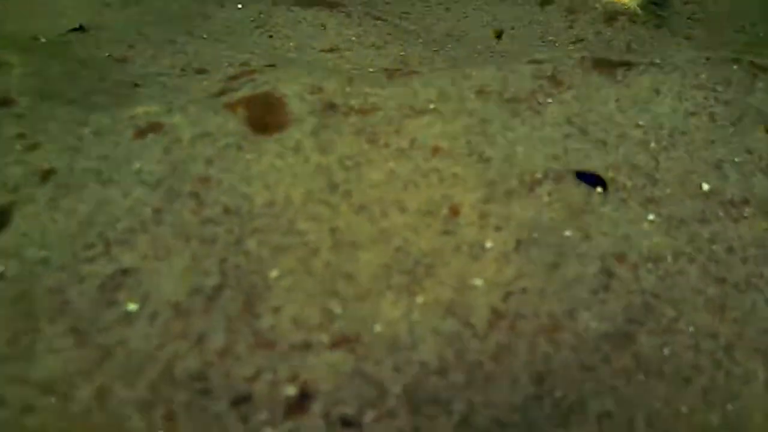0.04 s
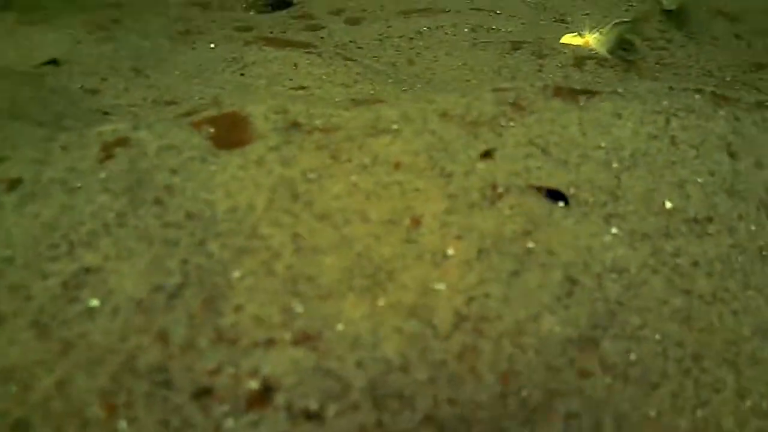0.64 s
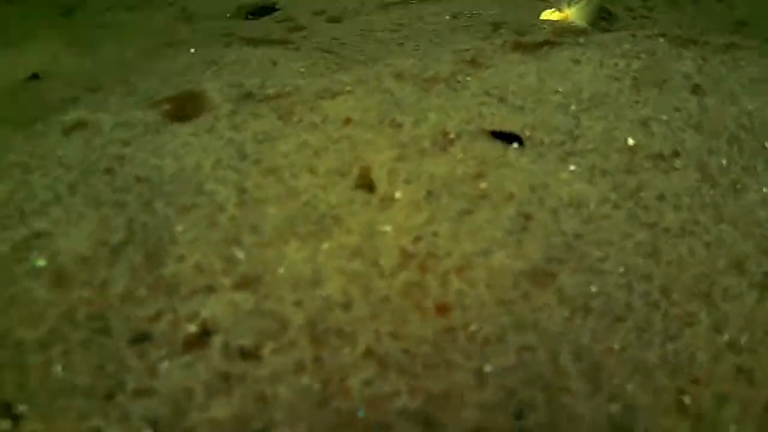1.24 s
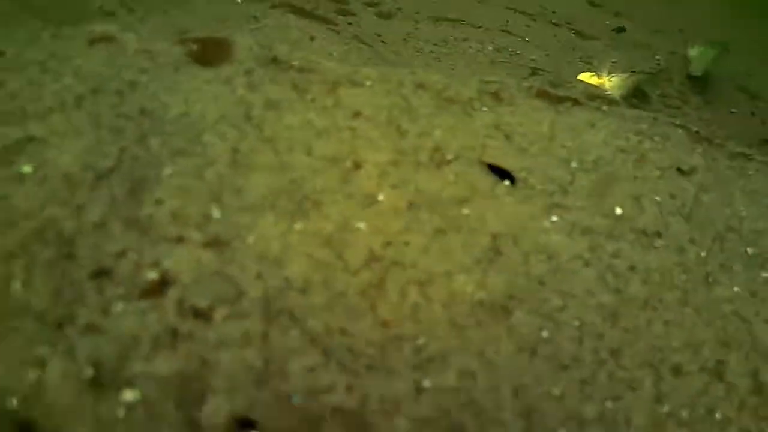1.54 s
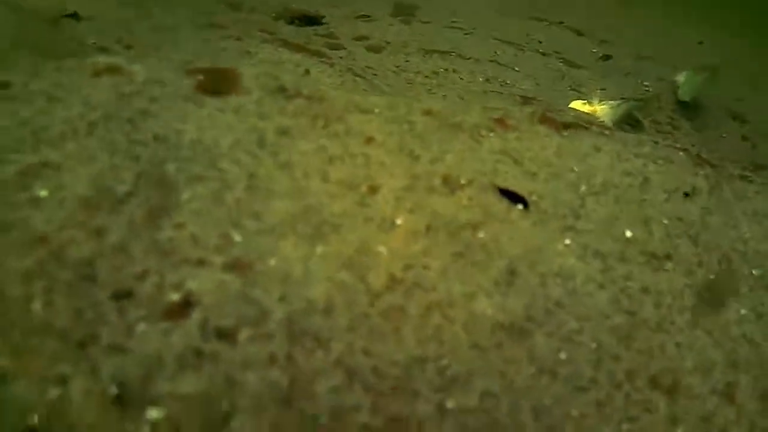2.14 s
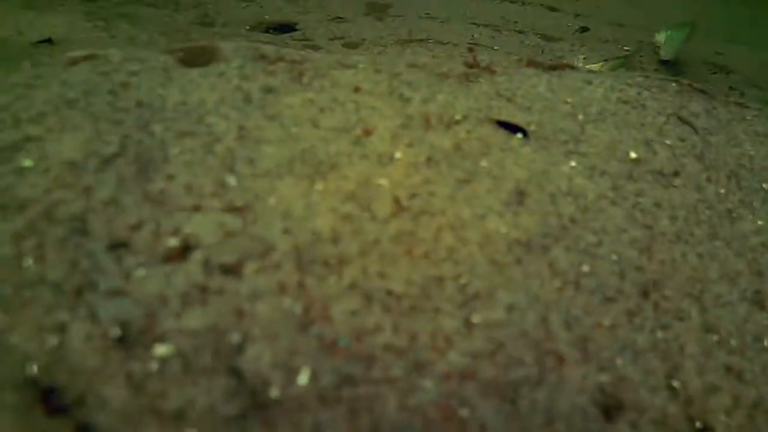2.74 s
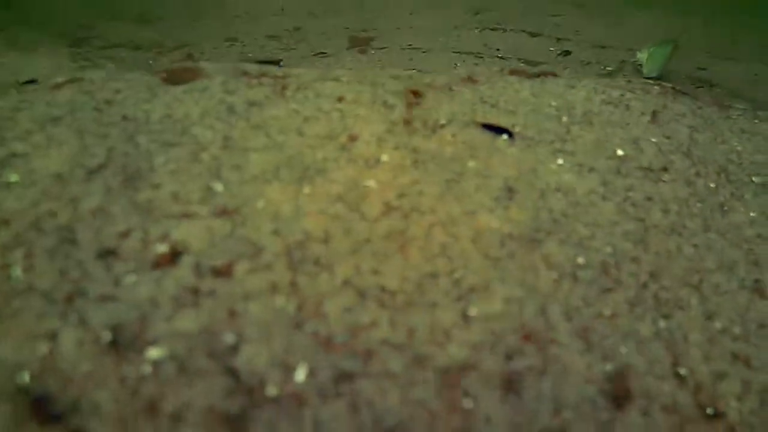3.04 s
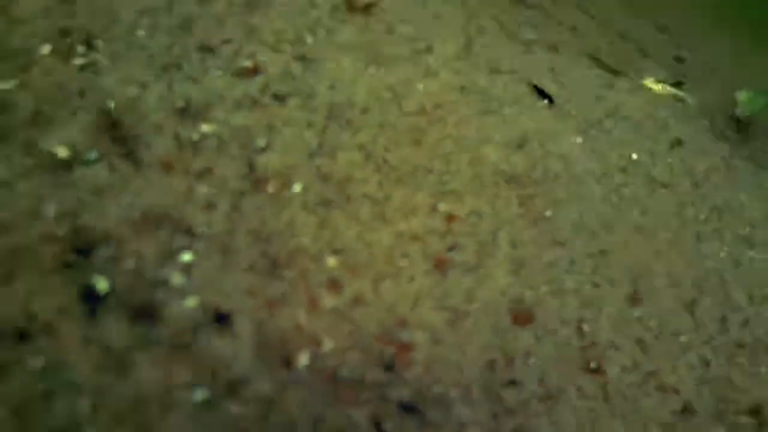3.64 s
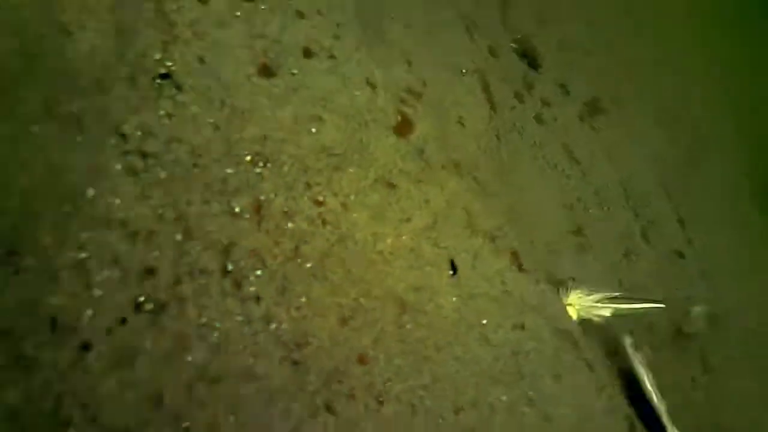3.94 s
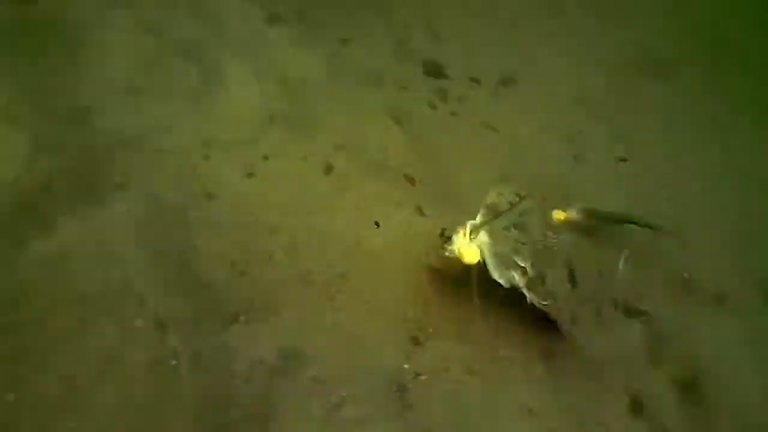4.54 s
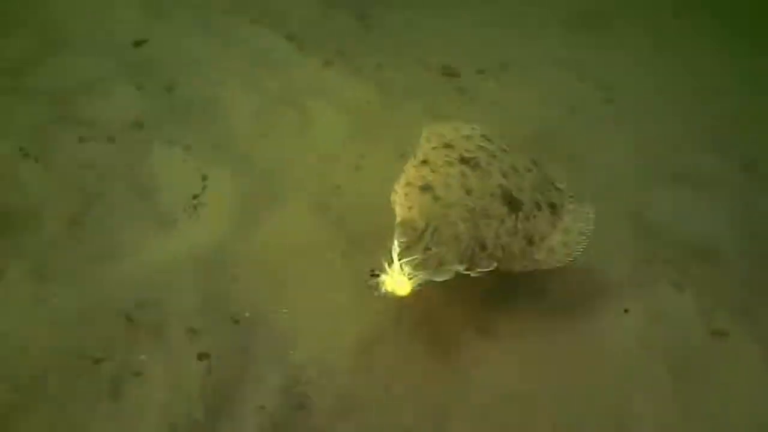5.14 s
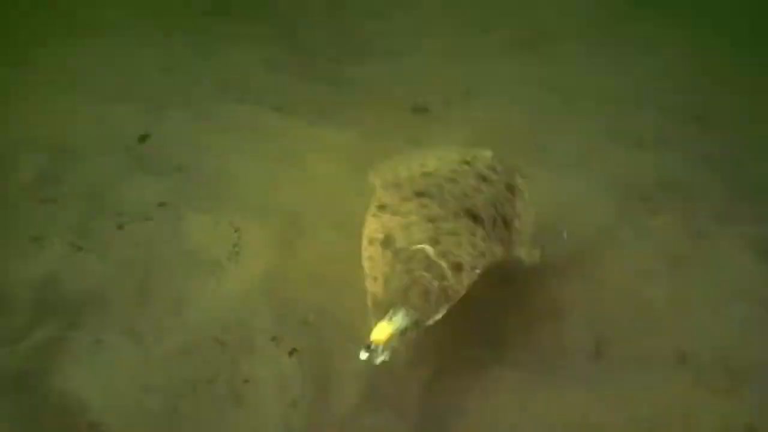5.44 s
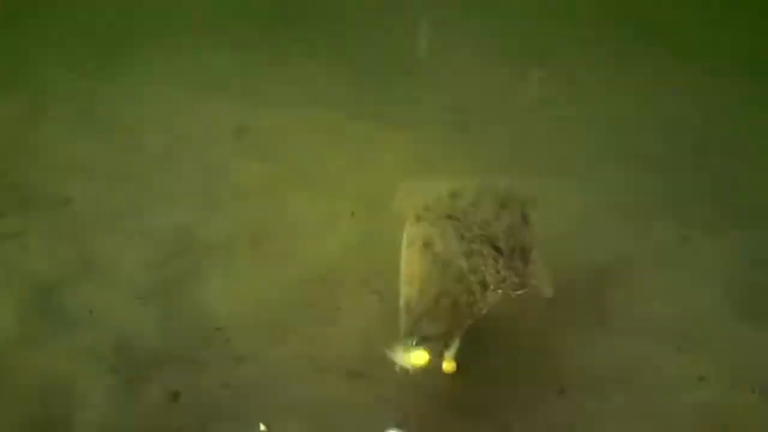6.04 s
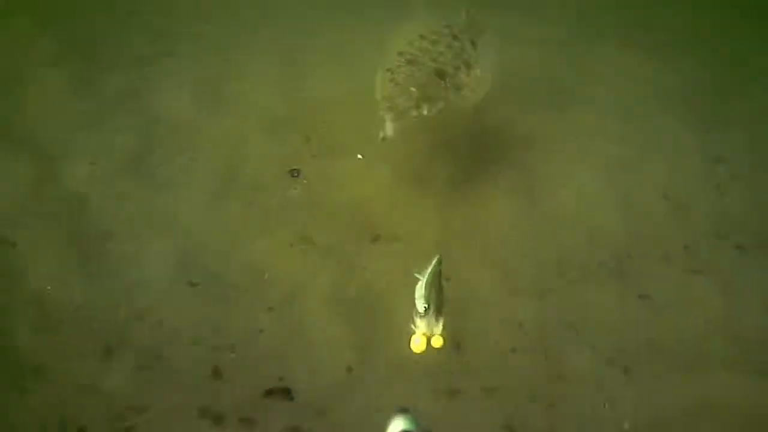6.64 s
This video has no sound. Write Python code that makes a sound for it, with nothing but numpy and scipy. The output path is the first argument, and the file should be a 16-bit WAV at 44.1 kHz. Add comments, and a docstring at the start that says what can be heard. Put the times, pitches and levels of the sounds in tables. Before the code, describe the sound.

Muffled underwater ticks and sand scrapes from a towed fishing rig, building to sharp rattles and knocks of tackle on its housing.

```python
"""Loose tackle rattles and knocks on a camera rig's watertight housing, heard from inside, as a fish
follows the lure. Each hit rings a few damped resonances; the hardest blows overload the microphone.
The rig is being towed over a sandy sea bed: grit ticks against it, sand scrapes it, and a big bump
leaves it sounding hollow. Behind that the tow line sings faintly and rasps through its clip,
and water swells against the housing."""
import sys
import numpy as np
from scipy import signal
from scipy.fft import rfft, irfft, next_fast_len
from scipy.io import wavfile

SR = 44100
rng = np.random.default_rng(int(sys.argv[2]) if len(sys.argv) > 2 else 0)


def output_pcm(signal):
    """Save a mono or channel-first signal as 16-bit PCM at the path in sys.argv[1].

    Samples are clipped to [-1, 1] before scaling.
    """
    pcm = np.clip(np.atleast_2d(signal).T, -1, 1) * 32767
    wavfile.write(sys.argv[1], SR, np.round(pcm).astype(np.int16))


N = 298998
HIT_SAMPLES = 2048
GRAZE_S, GRAZE_DB = .005, -20.5  # surfaces graze just before a contact closes

# Deep water pressure, and the steady noise bed. Each row: frequency in Hz, relative level in dB.
SWELL_SPECTRUM = [(10, 4.5), (45, -6), (70, -9), (110, -13.5), (220, -22), (400, -37.5), (800, -88.5)]
BED_SPECTRUM = [(8.8, -37), (15, 15.5), (22, -22.5), (53, -11.5), (77, -22), (112, -19.5), (417, -19.5),
                (527, -21), (1060, -28.5), (2200, -27), (2700, -34), (3720, -26.5), (5930, -33),
                (14200, -33.5), (16000, -41)]
# Jolts push water against the housing and tug the line.
# Each row: peak time in seconds, water level in dB, line level in dB before the line's trim.
JOLTS = [(0.38, -51, -58), (0.58, -51, -50), (3.52, -44.5, -56), (4.14, -43.5, -63), (4.755, -28, -38),
         (4.89, -31.5, -41.5), (5.479, -28, -46.5), (5.635, -34, -46.5), (6.045, -26, -45),
         (6.26, -36.5, -66)]
# The steady tow. Each row: time in seconds, line hiss in dB before its trim, sand patter in dB.
TOW_LEVELS = [(0, -49.5, -57), (.3, -50.5, -60.5), (1.0, -51.5, -63), (1.8, -50, -61), (2.4, -51, -58),
              (2.7, -52, -64.5), (3.25, -52.5, -66.5), (3.45, -49.5, -53), (4.4, -51.5, -60),
              (5.3, -50, -61.5), (6.35, -54, -65), (6.78, -55.5, -69)]
# The line's three lowest resonances drift with its load.
# Each row: time in seconds, then the first, second and third frequency in Hz.
LINE_DRIFT = [(0, 1570, 2100, 3466), (3.0, 1626, 2250, 3525), (3.8, 1566, 2220, 3600),
              (4.5, 1640, 2340, 3900), (5.0, 1640, 2170, 3500), (5.4, 1646, 2450, 3720),
              (6.4, 1670, 2375, 3170)]
# The shape of those three resonances. Each row: width in Hz, relative level in dB.
DRIFTING_MODES = [(177.4, 5), (170, 3), (333, 0)]

# What rings. Each row: frequency in Hz, width in Hz, relative level in dB.
MOUNT_MODE = [(201, 16, 0)]  # the shaken mount
UPPER_LINE_MODES = [(5000, 320, -6), (5750, 200, -20), (7700, 160, -5)]  # the towed line's steady top
ZING_MODES = [(1524, 66, 3), (3220, 180, -2), (5730, 89, -3), (7800, 240, -29)]  # the taut line sliding
SAND_MODES = [(950, 310, 0.5), (1390, 260, -1), (1638, 230, -0.5), (2166, 260, -1), (2720, 610, -7.5),
              (3400, 420, 1), (5390, 300, -9), (7800, 300, -23.5)]  # the rig rubbed by sand
GRIT_MODES = [(972.4, 253, -1.5), (1440, 119, 4), (2112, 140, -1), (2640, 366, -1), (3340, 214, 2.5),
              (4110, 280, -7.5), (5120, 480, -11), (5655, 400, -5.5), (7790, 260, -20.5), (8840, 410, -23)]  # the rig struck by grit
HOLLOW_MODE = [(970, 140, 5.4)]  # the rig's hollow ring
PUSH_MODES = [(84.3, 166, -1.5), (250.6, 210, 1), (483, 160, -0.5)]  # the whole housing shoved
SHELL_MODES = [(655, 110, -5), (886, 180, -10), (1143, 120, -8)]  # its shell, in the mids
WALL_MODES = [(1568, 116, -5), (1712, 182, -7), (2131, 150, -17), (3540, 170, -20.5)]  # its wall, higher up
TACKLE_MODES = [(852, 200, -6.5), (1567, 165, 1), (2020, 220, -0.5), (2520, 340, -5.5), (3170, 470, 0.5),
                (3600, 357, 3), (5290, 390, -8.5), (5760, 380, -7.5), (7795, 440, -19), (10180, 1300, -36)]  # the housing struck by tackle

# Tone colours. Each row: frequency in Hz, relative level in dB.
RASP_SPECTRUM = [(60, 3.5), (600, -1.5), (1600, 5), (2500, -2.5), (3500, 3.5), (4600, -17), (5700, -5),
                 (7000, -19), (10000, -20), (16000, -44)]  # the jerked line
CRACK_SPECTRUM = [(100, -12.5), (600, -10), (1200, 8.5), (4000, 10.5), (7000, -6), (10000, -18.5),
                  (13000, -17), (16000, -17.5)]  # the bright edge of a hard contact
CRUNCH_SPECTRUM = [(100, -7.5), (600, -0.5), (1600, -4.5), (3500, -4), (4600, -11), (5700, -1),
                   (8000, -14.5), (10500, -23), (16000, -33.5)]  # the dull edge of a blunt one
PASSAGE_EQ = [(200, -0.5), (650, -9.5), (950, 2), (7500, 0.5), (10000, 2), (16000, -12.5)]  # water and wall take low mids and top off small contacts

# Short strokes. Each row: start in seconds, length in seconds, level in dB.
MOUNT_HUMS = [(4.92, 0.116, -54)]  # the mount after a shake
LINE_RASPS = [(4.699, 0.027, -29.5), (4.731, 0.043, -25), (4.906, 0.015, -29), (5.03, 0.07, -57),
              (5.444, 0.032, -29.5), (6.041, 0.033, -27)]  # the line jerked through its clip
LINE_ZINGS = [(4.984, 0.019, -34), (5.014, 0.097, -38.5), (5.748, 0.021, -42)]  # the line sliding
RATTLE_SPELLS = [(4.587, .03, -42), (4.7, 0.077, -31.5), (5.011, .05, -32.5), (5.49, .02, -33),
                 (5.647, 0.026, -39), (5.753, .12, -39), (6.212, .025, -36.5)]  # loose tackle jiggling
# The rig sliding through sand. Each row: start and length in seconds, level in dB, body EQ in dB.
SAND_SCRAPES = [(0, 0.47, -61.5, -14), (3.705, 0.11, -56, 6), (3.816, 0.11, -51.5, -1),
                (4.011, 0.043, -35, 7), (4.123, 0.1, -51, 10), (4.271, 0.14, -49, 15),
                (4.637, 0.044, -43.5, 1), (4.773, .19, -43.5, 6), (4.985, 0.23, -55, 6.5),
                (5.47, 0.059, -35, 0.5), (5.537, 0.0202, -42.5, 6), (5.724, 0.0425, -37.5, 4),
                (5.787, 0.13, -47.5, 2.5), (5.907, 0.1, -52, 14), (6.049, 0.033, -37, 12),
                (6.213, 0.028, -40.5, -1)]
# Larger stones striking the rig. Each row: start in seconds, level in dB, body EQ in dB.
STONE_HITS = [(0.017, -44.5, 5), (0.0343, -46, 0), (0.4102, -46, 7), (0.4273, -36, -3), (0.5014, -35, -0.5),
              (0.5074, -46, 2), (0.5207, -38.5, -3.5), (0.5683, -41.5, 10), (0.6471, -42.5, 0),
              (0.6778, -36.5, -3.5), (0.6976, -43, -2), (0.7083, -45.5, 13), (0.8967, -45, -4),
              (0.9213, -47, 2), (1.065, -47.5, -3), (1.084, -45.5, 5.5), (1.1264, -48, 7),
              (1.2122, -39.5, 7), (1.2212, -41, -4), (1.2463, -37.5, -4), (1.365, -48, -8),
              (1.3771, -41, -2), (1.4225, -42, 2), (1.4363, -43, 2), (1.5584, -34.5, 1),
              (1.5897, -40.5, -1), (1.5951, -38, 11), (1.601, -41.5, 4), (1.7173, -33.5, 5),
              (1.732, -35, -5), (1.7376, -40, -6), (1.756, -40.5, 2), (1.7733, -45.5, 4), (1.846, -45, 0),
              (2.2508, -46, 13), (2.2763, -40, 2), (2.3055, -38, -2), (2.3222, -40.5, 5), (2.3429, -43, -4),
              (2.352, -41, 3), (2.499, -43.5, 9), (2.5229, -41, 0.5), (3.386, -43.5, -12), (3.3908, -36, 7),
              (3.3984, -32.5, -3), (3.418, -26, -3), (3.5068, -28.5, 3.5), (3.5505, -23.5, 3.5),
              (3.5758, -40, -1), (3.605, -34.5, -4), (3.6169, -33.5, 0.5), (3.667, -45.5, 7),
              (3.901, -21.5, -1.5), (3.9158, -33, 1), (3.9236, -37, -5), (4.0384, -28.5, -3.5),
              (4.062, -38.5, 1), (4.1009, -40.5, 9), (4.1445, -40.5, 2), (4.175, -39.5, 1),
              (4.188, -38.5, -20), (4.2346, -43.5, 7), (4.3013, -36.5, -14), (4.333, -39.5, 5)]
# The hollow ring opens at the big bump. Each row: time in seconds, send gain from 0 to 1.
HOLLOW_SEND = [(5.47, 0), (5.5, 0.9)]
# Heavy, blunt blows. Each row: start in seconds, then relative push, shell, wall and crunch in dB.
BLOWS = [(4.0112, -23, -44, -14.5, -46.5), (4.0172, -37.5, -41, -17.5, -39), (4.742, -24.5, -29, -26, -43),
         (4.757, -18.5, -32, -16.5, -38), (4.7624, -27, -42, -31, -24), (4.8596, -30, -33, -29, -47),
         (4.9, -27, -46, -35, -52), (4.906, -25, -44, -17.5, -63), (5.4737, -20.5, -10, -7, -13.5),
         (5.496, -37.5, -31.5, -29.5, -40), (5.6196, -33.5, -37.5, -31, -32.5),
         (5.626, -28, -36, -26, -32.5), (5.6319, -19, -25.5, -20, -39), (6.0342, -12, -12.5, -3, -11),
         (6.118, -46.5, -60, -32, -52)]
# Tackle clicking on the housing. Each row: start in seconds, level in dB, body and treble EQ in dB.
TACKLE_HITS = [(4.6188, -36.5, 4.5, 4), (4.6701, -35.5, 10, 5), (4.7045, -31, 15, 12),
               (4.7381, -27, -15, 7), (4.751, -27.5, -5, 15), (4.7749, -33, 7, -2), (4.8058, -36, 0, -7),
               (4.8206, -13.5, -2.5, 1), (4.8312, -19, -1, 1), (4.8549, -24.5, 0, 1), (4.8911, -25, -3, -1),
               (4.9159, -19, 4, 3), (4.9212, -22.5, 5, -9), (4.9378, -29, 9, 10), (4.9425, -29, -8, -4),
               (4.9518, -33, -4, -2), (4.9898, -30.5, 11, -4), (4.9973, -35.5, 7, -1), (5.0139, -35, 0, 0),
               (5.0389, -31, -3, 19), (5.0701, -22.5, -7, 6.5), (5.1552, -31.5, 5, 6.5),
               (5.1667, -35.5, 13, 0), (5.2255, -31.5, 4, 4), (5.2393, -36.5, 1, 11), (5.328, -37.5, 2, 3),
               (5.399, -43, 10.5, 13), (5.4491, -30, 8, 14), (5.4605, -18.5, 0, 4), (5.4684, -23.5, 5, 4),
               (5.4818, -12, 7, 13), (5.5149, -31, -3, 1), (5.5295, -26.5, 5, -3.5),
               (5.5598, -9.5, -0.5, -2.5), (5.5755, -19.5, -4, -1), (5.5849, -17.5, 4.5, 1),
               (5.5923, -29, 18, 13), (5.684, -29.5, 20, -5), (5.6988, -16, 1, 1.5), (5.7315, -33.5, 1, -8),
               (5.742, -31.5, 4, 5), (5.7535, -32, -2, 7), (5.7671, -30, 3, -6), (5.8292, -26.5, -7, -6),
               (5.862, -33.5, -4, -4), (5.8755, -27.5, 5, 4), (5.9561, -21, -0.5, -4),
               (5.9612, -28, -8, -8.5), (5.968, -32.5, 6.5, 1), (5.99, -43, 1, -11.5),
               (6.0206, -30.5, 14, 11), (6.0475, -3, -19, -12), (6.0551, -7.5, -5.5, 9),
               (6.0673, -31, 7, 1), (6.0838, -34.5, 11.5, 8.5), (6.1344, -23, 1, -4.5),
               (6.1451, -33.5, 11, -12), (6.241, -32.5, -12, -4), (6.2583, -39.5, -3, 5),
               (6.2772, -39.5, -7, 4.5)]


def amp(db):
    """Decibels to gain."""
    return 10 ** (np.asarray(db) / 20)


def unit(x):
    """Scale to rms 1."""
    return x / np.sqrt(np.mean(x ** 2) + 1e-20)


def unit_hit(x):
    """Scale a hit to the energy of 5 ms at rms 1."""
    return x / np.sqrt(np.sum(x ** 2) / (SR / 200) + 1e-20)


def eq(points):
    """An EQ curve through (Hz, dB) points on a log axis."""
    freqs, db = np.transpose(points)
    return lambda hz: amp(np.interp(np.log(hz + 1), np.log(freqs), db))


def resonances(modes):
    """Frequency response of a few damped modes, alternating in polarity."""
    return lambda hz: sum((-1) ** k * amp(db) * 1j * hz * width / (centre**2 - hz**2 + 1j * hz * width)
                          for k, (centre, width, db) in enumerate(modes))


def filtered(x, response):
    """Play x through a frequency response."""
    n = x.shape[-1]
    padded = next_fast_len(n + HIT_SAMPLES)
    return irfft(rfft(x, padded) * response(np.fft.rfftfreq(padded, 1 / SR)), padded)[..., :n]


def add(track, s, x):
    """Mix x into the track at s seconds."""
    part = track[max(round(s * SR), 0):][:len(x)]
    part += x[:len(part)]


def curves(rows):
    """An automation curve for each column after the time."""
    times, *columns = np.transpose(rows)
    return [np.interp(np.arange(N) / SR, times, column) for column in columns]


def strokes(rows):
    """Envelope of short strokes with soft edges."""
    level = np.zeros(N)
    for s, length, db in rows:
        add(level, s, amp(db) * signal.windows.tukey(round(length * SR), .2))
    return level


def surges(rows, fall_s, rise_s=0.02):
    """Envelope that swells up to each (seconds, dB) jolt and dies away after it."""
    t = np.arange(N) / SR
    swells = (amp(db) * np.exp(-np.maximum((s - t) / rise_s, (t - s) / fall_s)) for s, db in rows)
    return np.sqrt(sum(swell ** 2 for swell in swells))


def noise(response):
    """Coloured noise of rms 1."""
    return unit(filtered(rng.standard_normal(N), response))


def grains(per_s, spread_db):
    """Tiny random impacts of uneven size."""
    impacts = (rng.random(N) < per_s / SR) * rng.choice([-1, 1], N)
    return impacts * amp(spread_db * np.clip(rng.standard_normal(N), -2, 2))


def burst(t60):
    """A rough contact: noise that falls 60 dB in t60 seconds."""
    return rng.standard_normal(HIT_SAMPLES) * amp(-60 * np.arange(HIT_SAMPLES) / SR / t60)


def grazed(contact):
    """A faint graze leads in; the contact lands GRAZE_S later."""
    lead = round(GRAZE_S * SR)
    graze = rng.standard_normal(HIT_SAMPLES)[:lead] * np.linspace(.3, 1, lead)
    return np.concatenate([amp(GRAZE_DB) * unit_hit(graze), unit_hit(contact)])


def hardness(body_db, treble_db):
    """Colour of a contact through water and wall: soft ones are all body, hard ones are bright."""
    tilt = eq([(1700, body_db), (3200, 0.0039), (5600, treble_db), (7800, treble_db), (11000, 0)])
    return lambda hz: tilt(hz) * eq(PASSAGE_EQ)(hz)


def clicks(hits, modes, contact_t60, chatter_db, crack_db, crack_t60, vary_db, detune):
    """Small hard contacts: a tap and its chatter ring the modes, a little differently at each spot."""
    track = np.zeros(N)
    tap = unit_hit(signal.unit_impulse(HIT_SAMPLES, SR // 4000))
    for s, db, body_db, treble_db in hits:
        spot = [(hz * np.exp(detune * rng.normal()), width, level + vary_db * rng.normal())
                for hz, width, level in modes]
        force = grazed(tap + amp(chatter_db) * unit_hit(burst(contact_t60)))
        ring = unit_hit(filtered(force, resonances(spot)))
        crack = amp(crack_db) * unit_hit(filtered(grazed(burst(crack_t60)), eq(CRACK_SPECTRUM)))
        click = unit_hit(filtered(ring + crack, hardness(body_db, treble_db)))
        add(track, s - GRAZE_S, amp(db) * click)
    return track


def water(swell_db, bed_db):
    """Slow pressure swells on the housing, stronger at each jolt, over a faint steady hiss."""
    jolts = surges([(s, db) for s, db, _ in JOLTS], fall_s=0.05)
    pressure = np.hypot(amp(swell_db), jolts)
    return pressure * noise(eq(SWELL_SPECTRUM)) + amp(bed_db) * noise(eq(BED_SPECTRUM))


def mount_hum():
    """The shaken mount hums briefly in one low, narrow resonance."""
    return strokes(MOUNT_HUMS) * noise(resonances(MOUNT_MODE))


def tow_line(trim_db, sharpness):
    """The towed line sings: hiss through drifting resonances, louder at each tug."""
    hz, t, spectrum = signal.stft(rng.standard_normal(N), SR, nperseg=1024)
    times, *drifts = np.transpose(LINE_DRIFT)
    moving = [(np.interp(t, times, drift), width, db)
              for drift, (width, db) in zip(drifts, DRIFTING_MODES)]
    colour = np.abs(resonances(moving + list(UPPER_LINE_MODES))(hz[:, None])) ** sharpness
    hiss = signal.istft(spectrum * colour, SR, nperseg=1024)[1][:N]
    hiss_db, _ = curves(TOW_LEVELS)
    tugs = surges([(s, db) for s, _, db in JOLTS], fall_s=0.15)
    return amp(trim_db) * np.hypot(amp(hiss_db), tugs) * unit(hiss)


def sand_patter():
    """Fine sand patters on the rig, each grain a tiny ring."""
    _, sand_db = curves(TOW_LEVELS)
    colour = hardness(body_db=1, treble_db=-3)
    patter = filtered(grains(per_s=460, spread_db=9), lambda hz: resonances(GRIT_MODES)(hz) * colour(hz))
    return amp(sand_db) * unit(patter)


def line_slips():
    """The line slips in dense runs: broad and harsh when jerked, narrow and zinging when it slides."""
    rasp = unit(filtered(grains(per_s=3600, spread_db=-1), eq(RASP_SPECTRUM)))
    zing = unit(filtered(grains(per_s=1500, spread_db=2), resonances(ZING_MODES)))
    return strokes(LINE_RASPS) * rasp + strokes(LINE_ZINGS) * zing


def sand_scrapes():
    """Sliding through sand: a dense run of grains rings the rig for the length of each stroke."""
    track = np.zeros(N)
    sand = unit(filtered(grains(per_s=4000, spread_db=10), resonances(SAND_MODES)))
    for s, length, db, body_db in SAND_SCRAPES:
        run = sand[round(s * SR):][:round(length * SR)]
        scrape = unit(filtered(run, hardness(body_db, treble_db=0.5)))
        add(track, s, amp(db) * signal.windows.tukey(len(run), .3) * scrape)
    return track


def stone_ticks(treble_db, treble_per_db):
    """Stones tick against the rig; the harder the strike, the brighter the tick."""
    median_db = np.median([db for _, db, _ in STONE_HITS])
    hits = [(s, db, body_db, treble_db + treble_per_db * (db - median_db))
            for s, db, body_db in STONE_HITS]
    return clicks(hits, GRIT_MODES, contact_t60=0.015, chatter_db=1.5,
                  crack_db=-13, crack_t60=0.012, vary_db=2.5, detune=0.024)


def hollow_ring(contacts):
    """From the big bump on, contacts also ring one hollow mode of the rig."""
    return curves(HOLLOW_SEND)[0] * filtered(contacts, resonances(HOLLOW_MODE))


def housing_knocks(contact_t60, push_t60, crunch_t60, push_trim_db, chatter_db, soft_hz):
    """Blunt blows shove the housing, ring its shell and wall, and crunch at the point of contact."""
    track = np.zeros(N)
    tap = unit_hit(signal.unit_impulse(HIT_SAMPLES, SR // 1000))

    def ring(modes, t60):
        force = grazed(tap + amp(chatter_db) * unit_hit(burst(t60)))
        return unit_hit(filtered(force, lambda hz: resonances(modes)(hz) / (1 + 1j * hz / soft_hz) ** 2))

    for s, push_db, shell_db, wall_db, crunch_db in BLOWS:
        push = amp(push_db + push_trim_db) * ring(PUSH_MODES, push_t60)
        shell = amp(shell_db) * ring(SHELL_MODES, contact_t60)
        wall = amp(wall_db) * ring(WALL_MODES, contact_t60)
        crunch = amp(crunch_db) * unit_hit(filtered(grazed(burst(crunch_t60)), eq(CRUNCH_SPECTRUM)))
        add(track, s - GRAZE_S, push + shell + wall + crunch)
    return track


def tackle_rattle(jiggles_per_s, spread_db, body_db, treble_db):
    """Tackle strikes the housing: clear hits, plus small, unevenly spaced clicks while it jiggles."""
    hits = list(TACKLE_HITS)
    for s, length, db in RATTLE_SPELLS:
        count = max(round(length * jiggles_per_s), 1)
        for k in range(count):
            start = s + length * (k + rng.random()) / count
            hits.append((start, db + spread_db * rng.normal(), body_db, treble_db))
    return clicks(hits, TACKLE_MODES, contact_t60=0.016, chatter_db=0,
                  crack_db=-17, crack_t60=0.0097, vary_db=1.5, detune=0.011)


def scene():
    """Everything reaches the one microphone through the housing."""
    stones = stone_ticks(treble_db=-1, treble_per_db=0.26)
    tackle = tackle_rattle(jiggles_per_s=65, spread_db=0, body_db=5.5, treble_db=-0.5)
    knocks = housing_knocks(contact_t60=0.004, push_t60=0.0043, crunch_t60=0.012,
                            push_trim_db=1, chatter_db=-0.5, soft_hz=11950)
    contacts = tackle + sand_scrapes()
    towing = tow_line(trim_db=-7, sharpness=1.8) + sand_patter() + water(swell_db=-58.5, bed_db=-55)
    background = towing + line_slips() + mount_hum()
    return (background + stones + knocks + contacts + hollow_ring(contacts))[None]


def record(dry):
    """The input stage flattens the loudest peaks, then a steep low-pass cuts the very top."""
    ceiling, top_hz = 0.71, 16200
    clipped = dry / (1 + np.abs(dry / ceiling) ** 8) ** (1 / 8)
    return filtered(clipped, lambda hz: hz < top_hz)


dry = scene()
out = record(dry)
output_pcm(out)
```